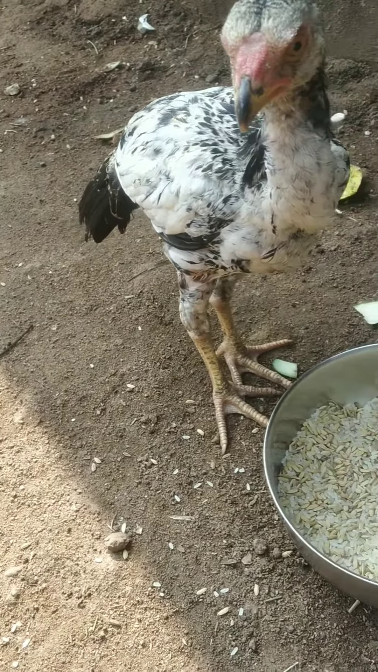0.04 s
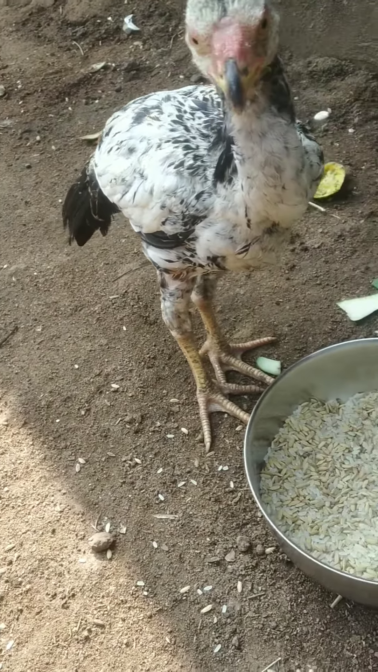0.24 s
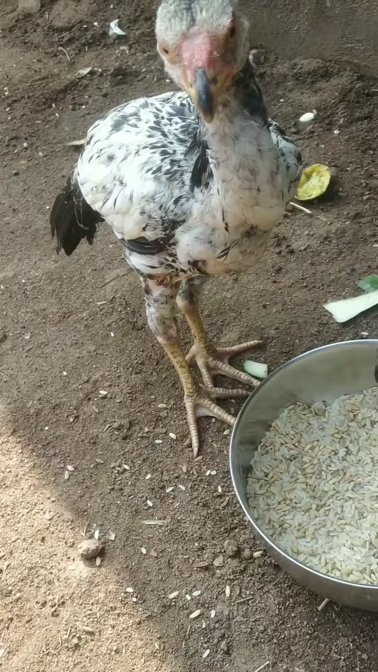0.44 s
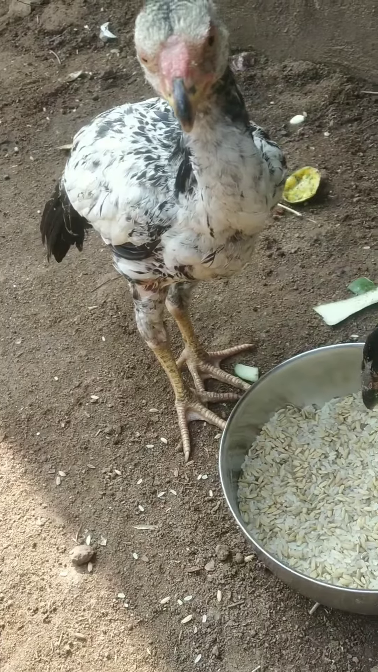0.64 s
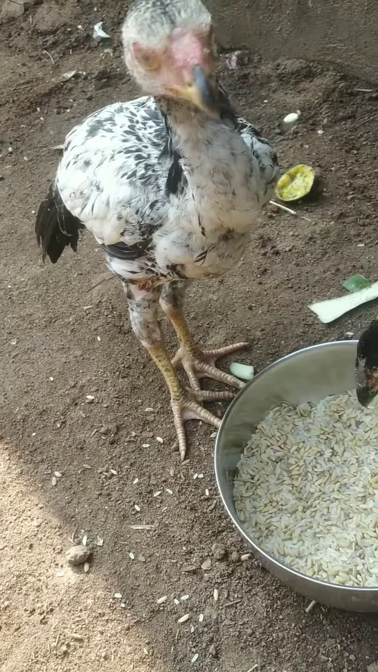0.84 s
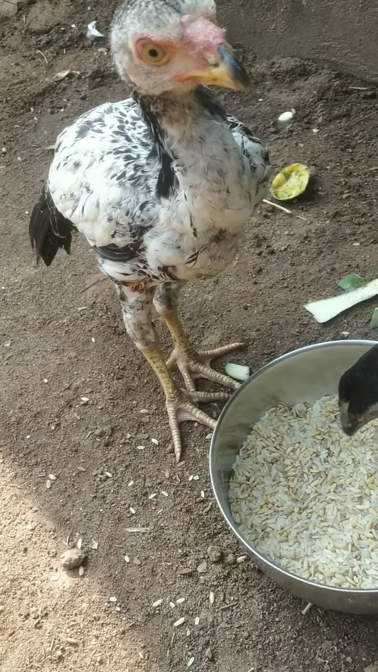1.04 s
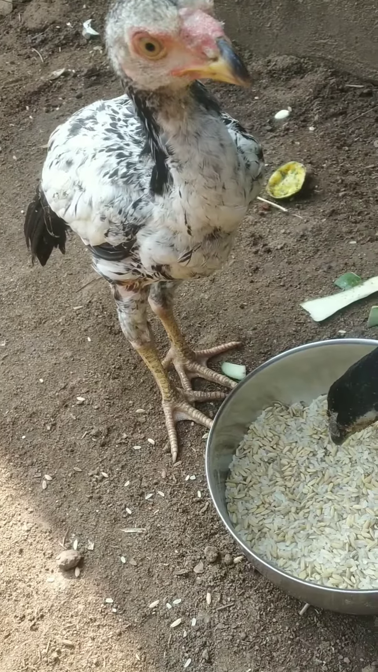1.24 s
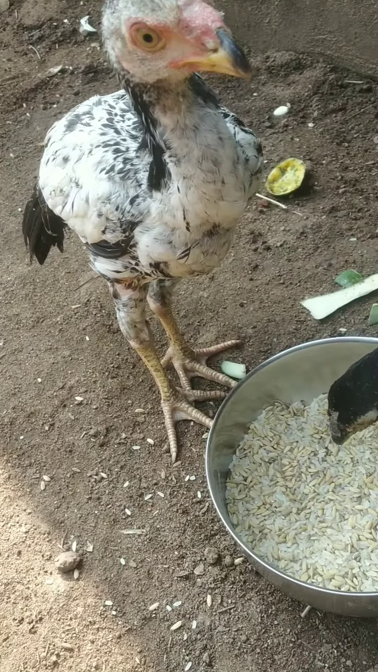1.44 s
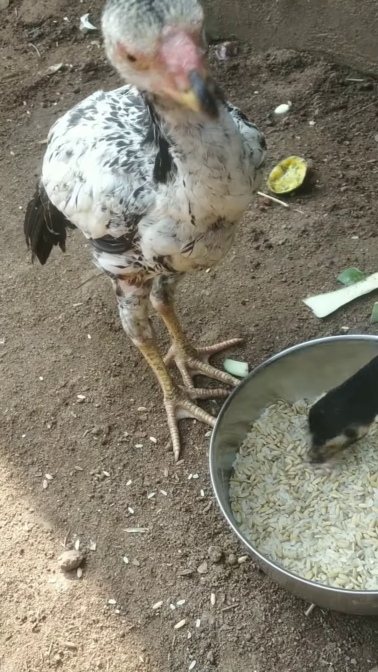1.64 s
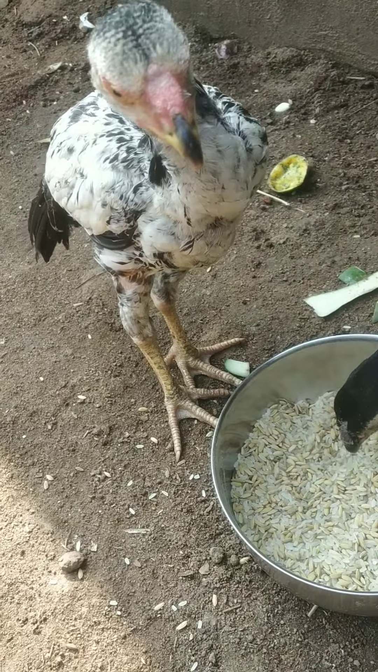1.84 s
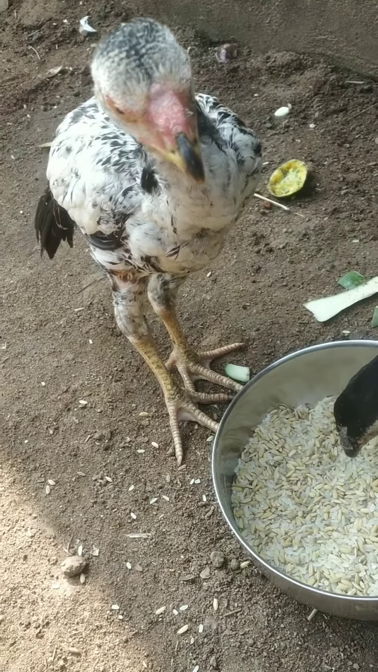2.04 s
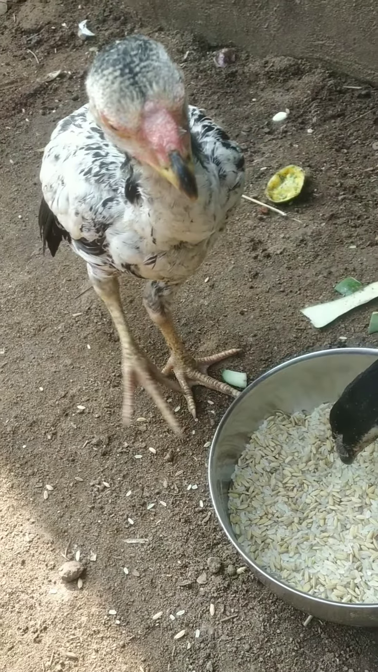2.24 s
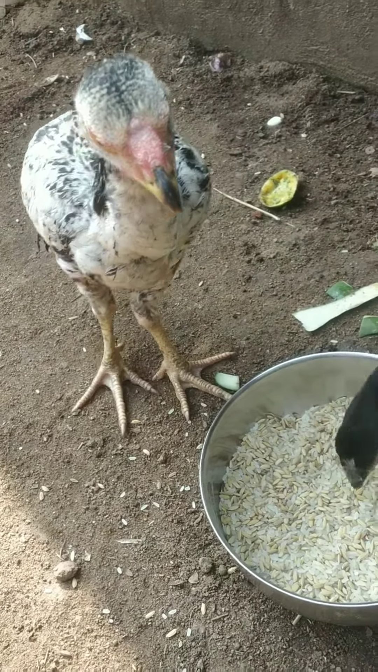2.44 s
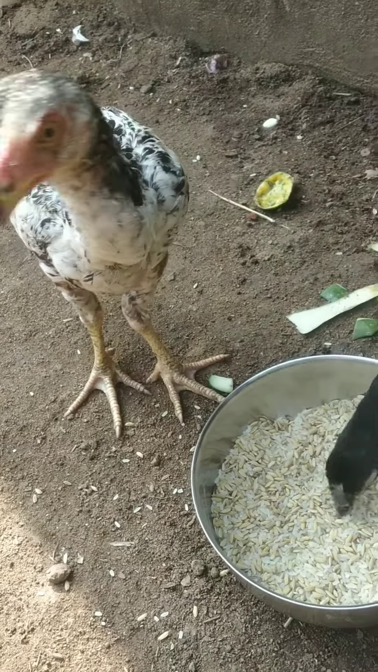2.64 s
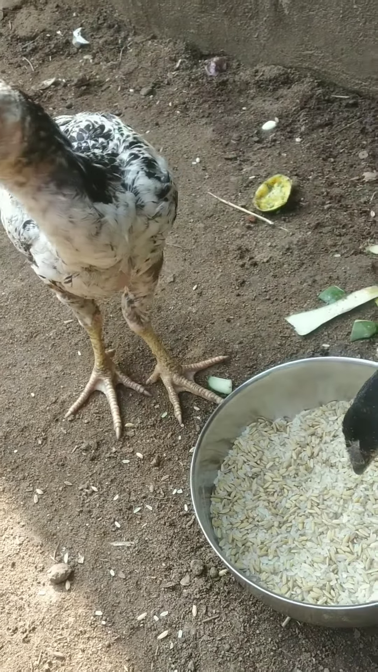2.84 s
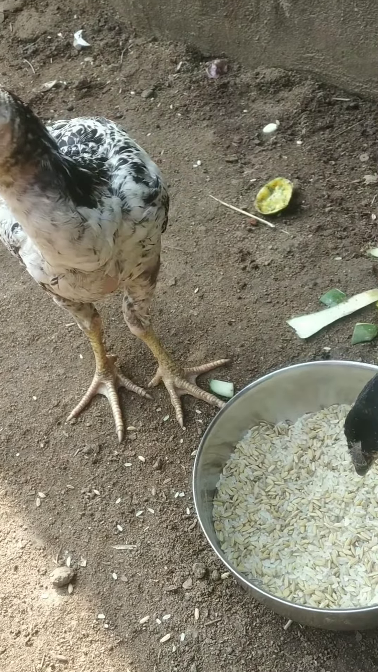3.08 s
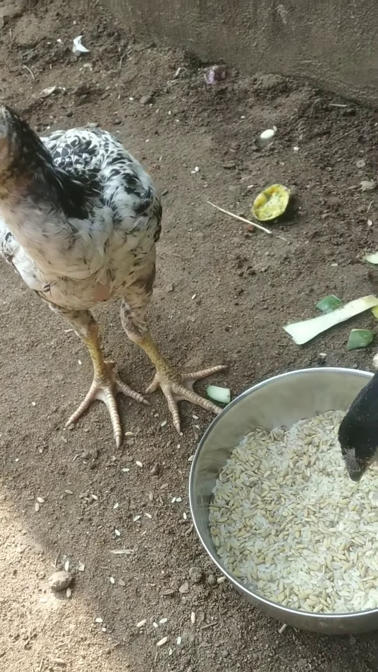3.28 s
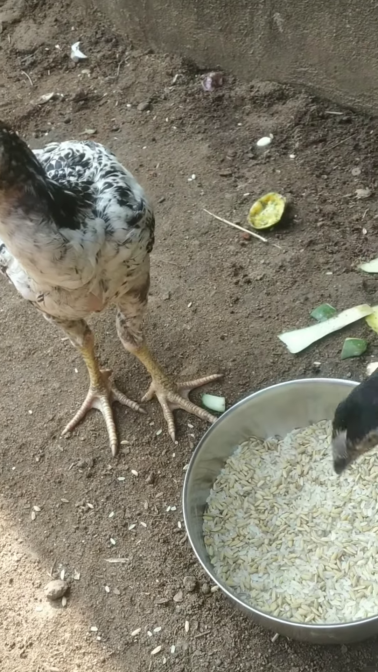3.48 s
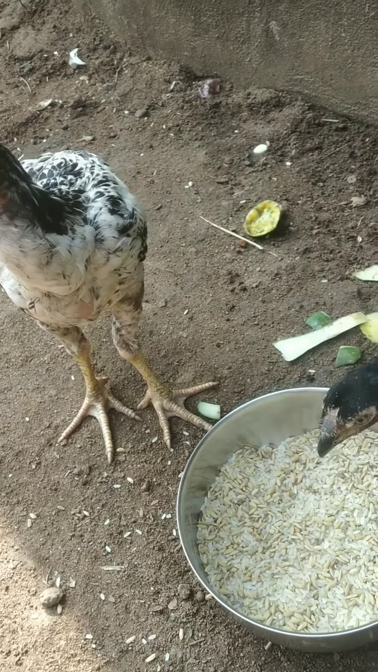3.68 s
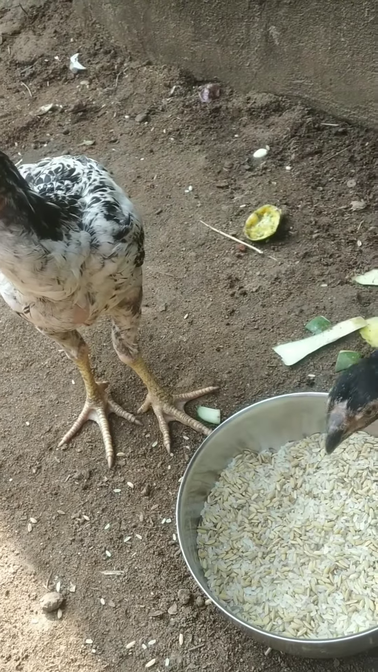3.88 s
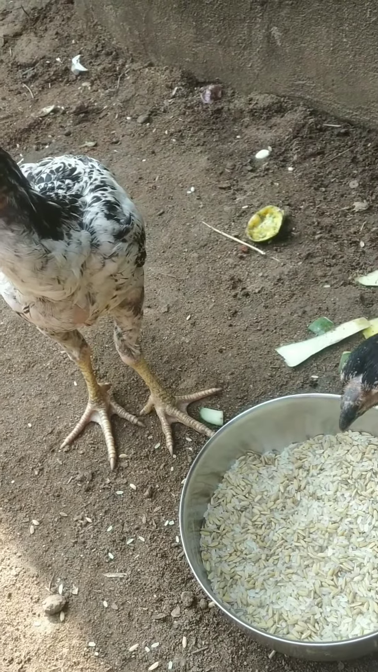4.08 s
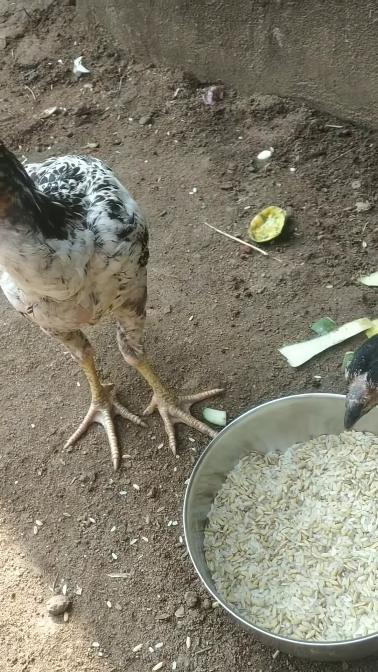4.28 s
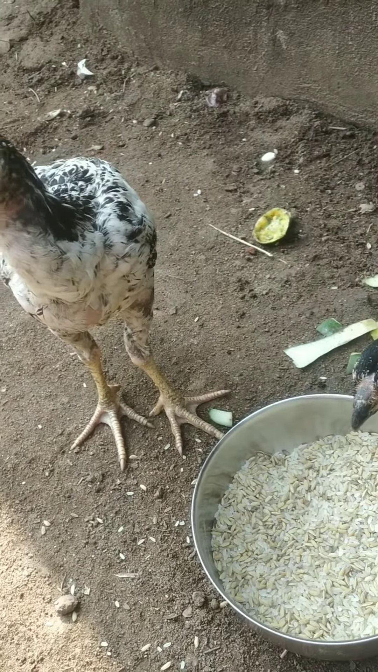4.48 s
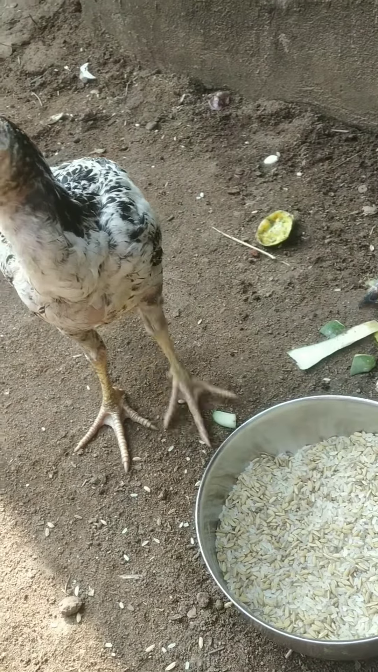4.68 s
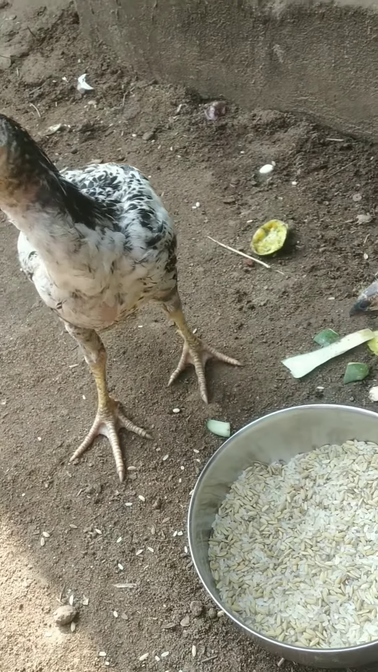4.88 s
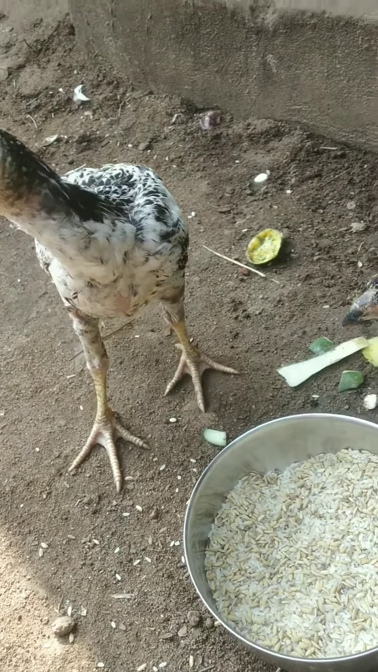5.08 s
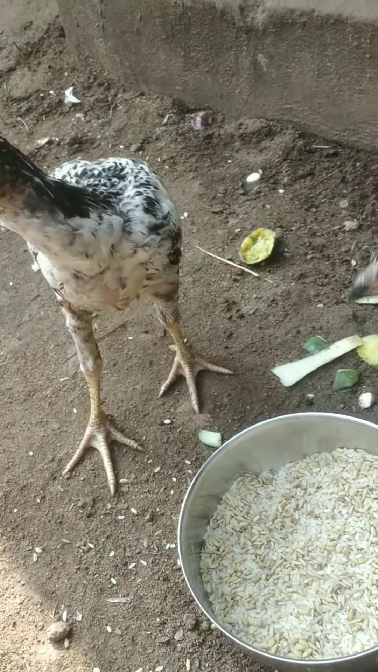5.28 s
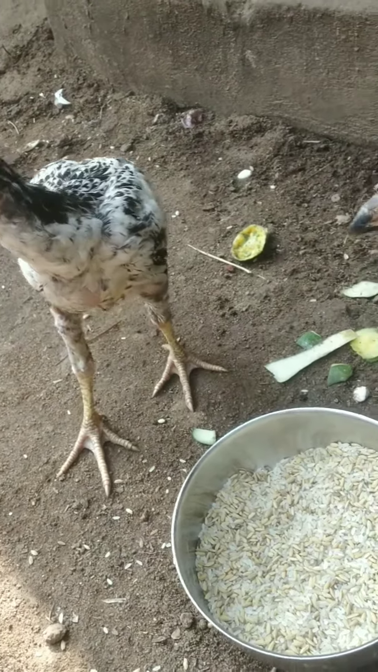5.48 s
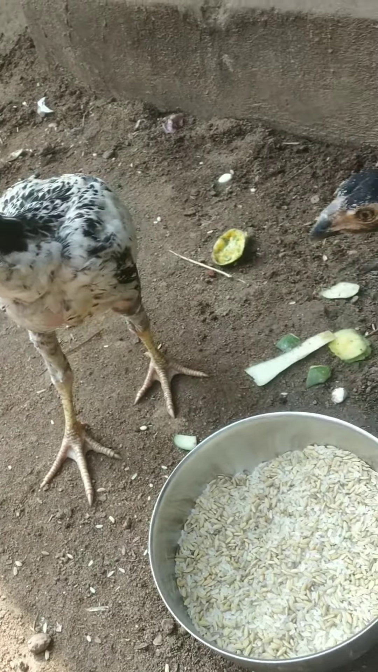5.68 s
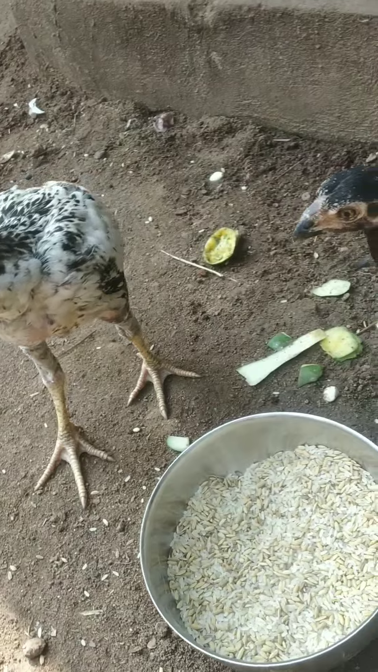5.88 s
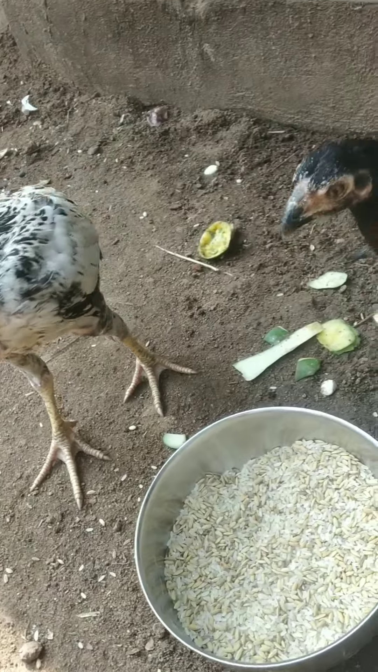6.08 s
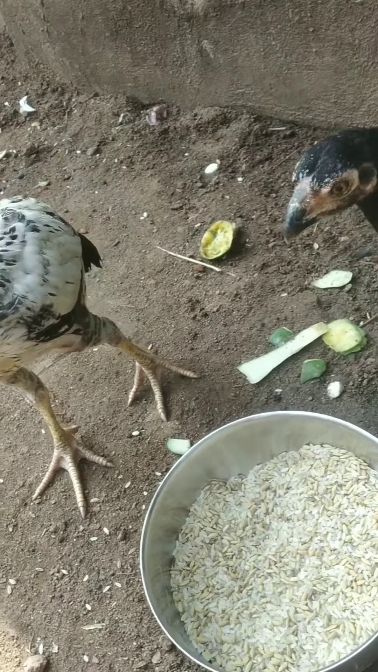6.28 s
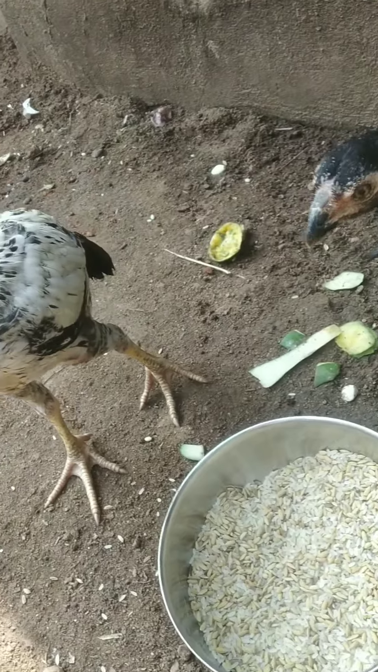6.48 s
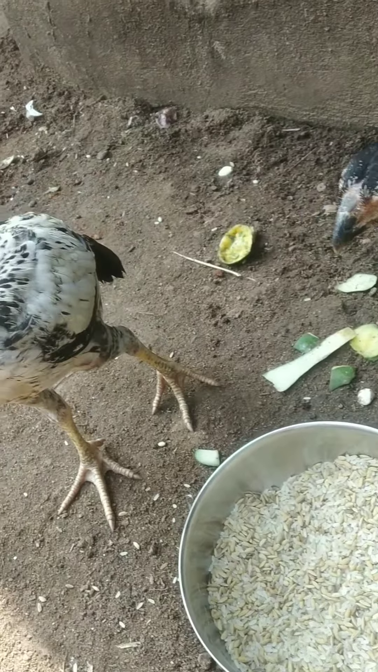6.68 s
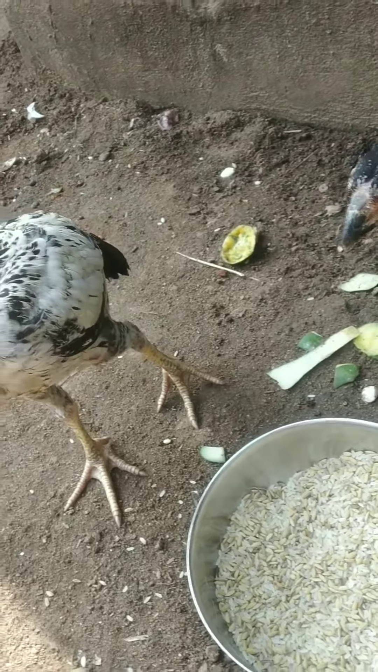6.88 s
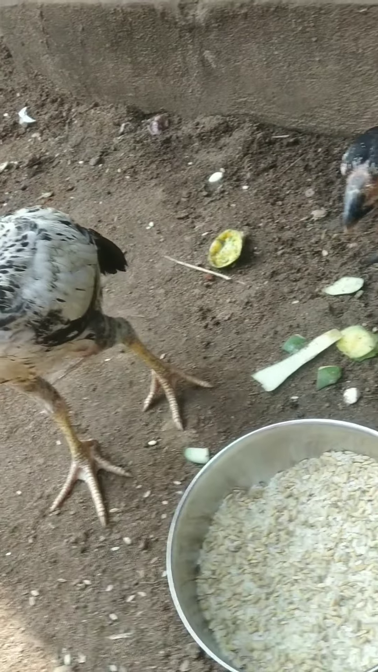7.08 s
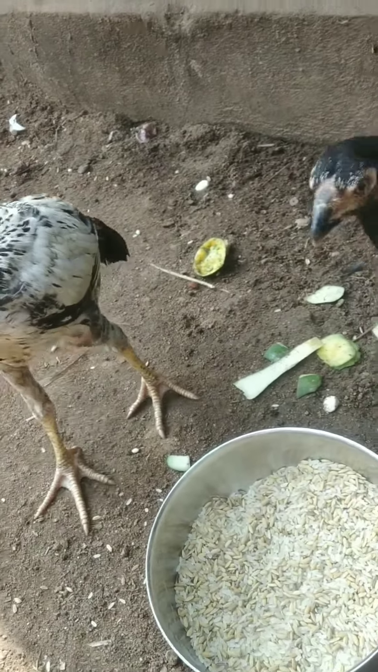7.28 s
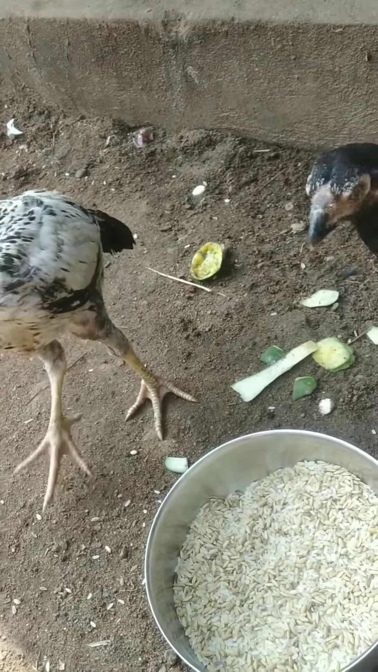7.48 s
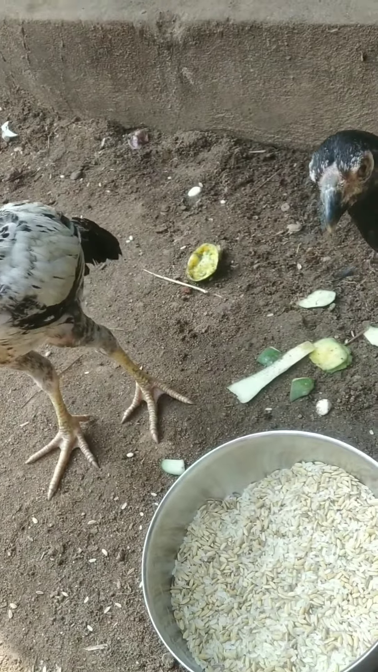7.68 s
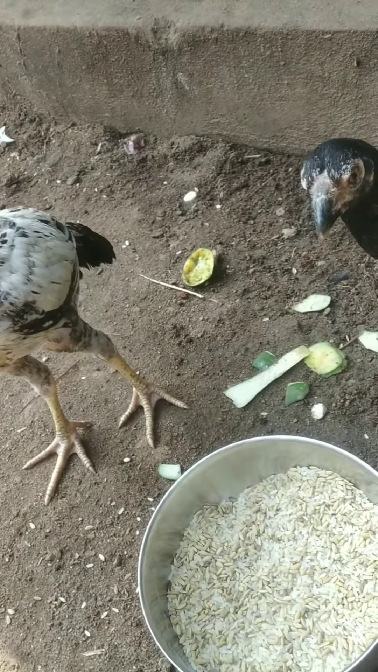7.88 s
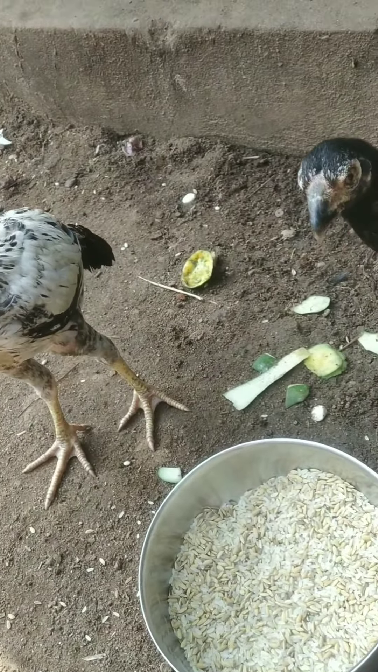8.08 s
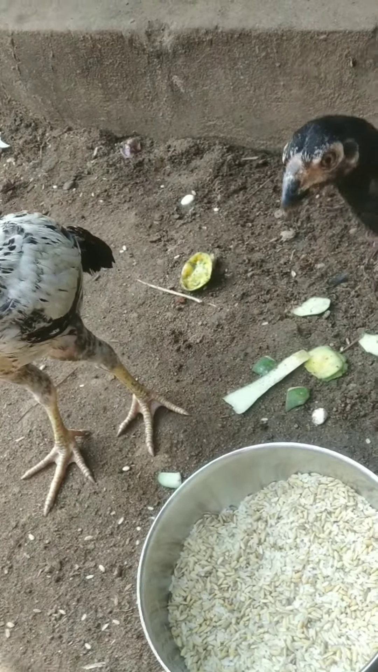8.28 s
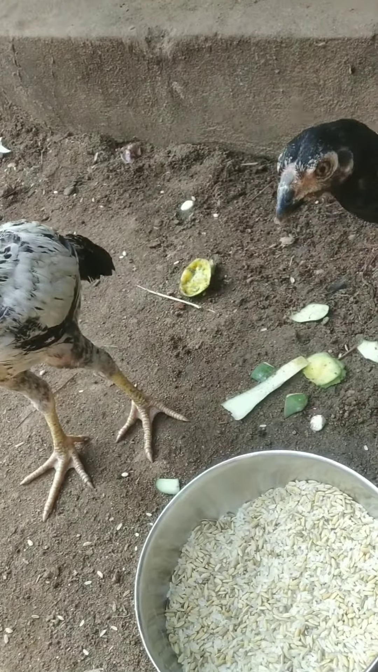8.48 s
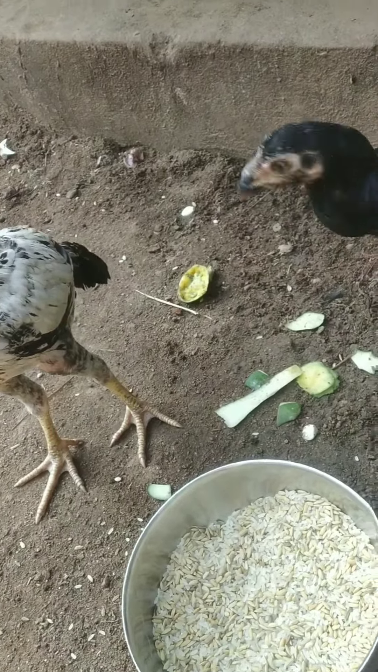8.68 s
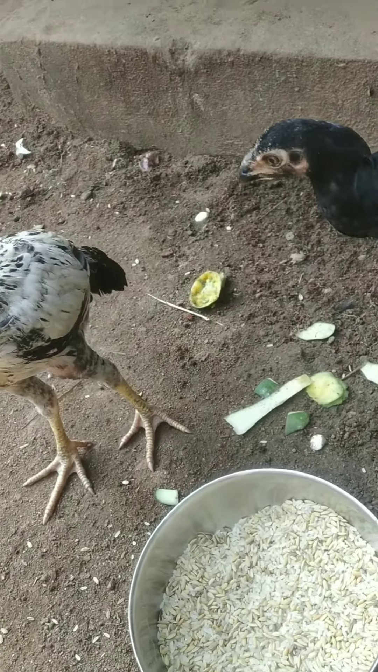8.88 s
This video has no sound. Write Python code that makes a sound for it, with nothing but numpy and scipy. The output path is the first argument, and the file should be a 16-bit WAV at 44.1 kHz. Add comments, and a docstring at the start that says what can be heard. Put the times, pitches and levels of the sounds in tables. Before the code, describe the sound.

Young hens squeak close by in hoarse, trilling calls, with a few low clucks, beak taps and feet scraping grit outdoors.

```python
"""Young hens in a yard

Young hens call close by in hoarse, trilling squeaks: a whistle that rasps where the membranes flap
unevenly. The nearest is on the left, and its loudest squeaks overload the recorder. An older hen
clucks low, feet scrape the grit and beaks tap. Small birds chirp far off, the ground and a low wall
throw short echoes, and traffic hums under a hiss of leaves."""
import sys
import numpy as np
from scipy import signal
from scipy.fft import rfft, irfft
from scipy.io import wavfile
from scipy.ndimage import uniform_filter1d

SR = 44100
rng = np.random.default_rng(int(sys.argv[2]) if len(sys.argv) > 2 else 0)


def file_out(sig):
    """Save sig as 16-bit WAV at sys.argv[1]."""
    # one column per channel
    cols = np.atleast_2d(sig).T
    # limit, then scale
    lim = np.clip(cols, -1, 1)
    pcm = np.round(lim * 32767).astype(np.int16)
    wavfile.write(sys.argv[1], SR, pcm)


N = 393813


def squeak(t, pitch, whistle_db, rasp_db, trill, half, treble_db, trill_hz=50.33, split_hz=4350):
    """A young hen's trilling whistle; where the membranes flap unevenly it smears and rasps."""
    # Windpipe resonances that the whistle rings as it crosses them. Each row: frequency in Hz, gain in dB.
    resonances = [(700, -12), (1100, 18.5), (1500, 12), (2000, 1), (2250, -1), (2480, 0.5), (2700, -2),
                  (2900, -2.5), (3600, 4.5), (5000, 0)]
    # Windpipe and beak colour of the rasp and treble. Each row: frequency in Hz, gain in dB.
    windpipe = [(250, -11), (700, 8.5), (1050, 8), (1700, 8.5), (3600, 7.5), (4150, 22), (4600, -6),
                (5300, 0), (6000, -8), (6900, -4), (8100, -1), (9300, -5.5), (10200, -5.5), (11700, -17),
                (14500, -10), (16000, -2.5)]
    n = len(t)
    trill, half = np.clip([trill, half], 0, 1)
    rough = np.clip((rasp_db - whistle_db + 13.5) / 12, 0, .9)

    # Each trill note arches in pitch, sweeps steeply where the call glides and dips in level at its ends.
    beat = (np.cumsum(trill_hz * (1 + 0.089 * drift(n, 28.6))) / SR) % 1
    arch = np.sin(np.pi * beat) ** .6
    hz = np.interp(t + 2.166 * trill * (beat - .5) / trill_hz, t, pitch)
    hz = uniform_filter1d(hz * (1 + 0.14 * trill * (arch - .75)), size=40)
    turns = np.cumsum(hz * (1 + 0.012 * drift(n, 810) + 0.0112 * rough * drift(n, 46.7))) / SR
    gliding = np.clip(uniform_filter1d(abs(np.gradient(pitch)) * SR, size=300) / 40000, 0, 1)
    depth = trill + 0.35 * (1 - trill) * gliding  # swoops break into separate notes
    throb = (1 - depth + depth * arch ** (0.62 + 1.12 * gliding)) / (1 - 0.055 * depth)
    smear = rough * noise_band(turns, 160 + 1400 * rough.mean() ** 4)
    whistle = np.sqrt(2 - 2 * rough ** 2) * np.sin(2 * np.pi * turns) + smear

    catch = amp(3.2 * drift(n, 15.6))  # the half-pitch bands catch and let go
    below = half * catch * noise_band(turns / 2, 78.5) + 0.33 * noise_band(.72 * turns, 295)
    below += (0.094 + 0.11 * rough) * noise_band(0.57 * turns, 1340)  # a broad wash under the whistle
    between = sum(noise_band(k * turns / 2, 223) * amp(2.46 * drift(n, 21.3)) * (k * hz < .7 * SR)
                  for k in (5, 7, 9))
    between += 0.86 * catch * noise_band(1.58 * turns, 254)  # a nasal band over the whistle
    # Each overtone comes and goes as the beak moves.
    overtones = sum(rough_tone(k * turns, rough, 620) * (k * hz < .35 * SR) * amp(2.1 * drift(n, 23.0))
                    for k in range(2, 6))
    hiss = rng.standard_normal(n) * amp(2.3 * drift(n, 130))
    rasp = evened(below) + 0.25 * hiss + 0.3 * (1 - gliding) * overtones
    rasp = colour(rasp, windpipe, hi_hz=split_hz) * (1 - 0.33 * gliding)
    treble = overtones + half * between + 0.6 * hiss
    treble = colour(treble, windpipe, lo_hz=split_hz) * (1 - 0.7 * gliding)

    height = hz / hz.max()
    effort = np.hypot(0.65 * amp(whistle_db), amp(rasp_db)) * height ** 1.4  # brightest at the top
    voice = amp(whistle_db + curve(resonances, hz)) * whistle
    voice += amp(rasp_db) * height ** 0.27 * rasp
    voice += amp(treble_db + 5.5) * effort * treble
    attack_s, release_s = 0.019, 0.011
    edges = np.clip(t / attack_s, 0, 1) * np.clip((t[-1] - t) / release_s, 0, 1)
    return voice * throb * np.sin(np.pi / 2 * edges) ** 2


def contour(length, fall, from_hz, first_hz, last_hz, to_hz, first_db, last_db, first_rasp, last_rasp):
    """A squeak's pitch swoops in, holds on a slight arch and slides away; both ends are hoarser."""
    swoop_hz_per_s, arch_per_s = 50000, .25
    t = np.arange(0, length, 1 / SR)
    rise = np.clip(abs(first_hz - from_hz) / swoop_hz_per_s, .002, 0.69 * length)
    fall = np.clip(fall, .002, 0.53 * length)
    knees, hold = [0, rise, length - fall, length], length - rise - fall
    bulge = 1 + arch_per_s * hold * np.sin(np.pi * np.clip((t - rise) / hold, 0, 1))
    pitch = np.interp(t, knees, [from_hz, first_hz, last_hz, to_hz]) * bulge
    whistle_db = np.interp(t, knees, [first_db + 2.5, first_db, last_db, last_db])
    whistle_db -= 9.5 * np.clip(1 - (length - t) / fall, 0, 1) ** 2
    hoarse_db = np.interp(t, knees, [first_rasp + 6, first_rasp, last_rasp, last_rasp + 4.5])
    return t, pitch, whistle_db, whistle_db + hoarse_db


def cluck(length, hz, end_hz, db, rough):
    """The older hen: a low stack of overtones, blurred by uneven pulses and shaped by the throat."""
    # Throat colour. Each row: frequency in Hz, gain in dB.
    throat = [(200, -5.5), (400, -6), (720, 14), (1050, 2), (1500, -8), (3000, -14.5)]
    glide = np.linspace(hz, end_hz, round(length * SR))
    turns = np.cumsum(glide * (1 + 0.0885 * rough * drift(len(glide), 79))) / SR
    stack = sum(rough_tone(k * turns, rough, 197) for k in range(1, 9))
    return amp(db) * colour(stack, throat) * signal.windows.tukey(len(glide), .5)


def scrape(length, top_s, grit_db, thud_db):
    """Grains of grit crunch under a claw while the foot thuds on the earth."""
    # Colours of bright grit and dull earth. Each row: frequency in Hz, gain in dB.
    crunch = [(290, -33), (500, 1.5), (3670, 8.5), (4360, 3), (7020, 9), (15800, 8)]
    earth = [(90, -69), (200, -2.5), (450, -10.5), (900, -16.0), (2000, -28.0)]
    t = np.arange(0, length, 1 / SR)
    stroke = amp(np.interp(t, [0, top_s, length], [-4.5, 0, -6.5]))
    grains = rng.standard_normal((2, len(t))) * amp(1.17 * drift(len(t), 730) + 2.6 * drift(len(t), 48))
    grains[1] = .5 * np.roll(grains[0], 21) + 0.35 * grains[1]  # later and softer on the right
    grit = colour(grains, crunch) * amp([[4], [-2]]) * amp(grit_db)
    thud = colour(rng.standard_normal(len(t)) * amp(3.7 * drift(len(t), 26.4)), earth) * amp(thud_db)
    return (grit + thud) * stroke * signal.windows.tukey(len(t), .45)


def tap(db, knock_db):
    """A beak or a kicked stone strikes: a short crack of grit and a dull knock."""
    t = np.arange(1800) / SR
    tick = rng.standard_normal(len(t)) * amp(-60 * t / 0.033) * 0.3
    knock = amp(knock_db) * np.sin(2 * np.pi * rng.uniform(250, 540) * t) * amp(-60 * t / 0.013)
    return amp(db) * (tick + knock) * np.minimum(t / 0.0015, 1)


def chirp(length, hz, end_hz, db):
    """A small bird's falling whistle, blurred by distance and scattered echoes."""
    glide = np.linspace(hz, end_hz, round(length * SR))
    tone = noise_band(np.cumsum(glide) / SR, 310) * signal.windows.tukey(len(glide), .5)
    echoes = rng.standard_normal(3500) * amp(-60 * np.arange(3500) / SR / 0.21)
    return amp(db) * evened(signal.fftconvolve(tone, echoes))


def walls(x, t60=0.11):
    """Scattered echoes from the ground and the low wall."""
    t = np.arange(8000) / SR
    echoes = rng.choice([-1., 1.], (2, len(t))) * (rng.random((2, len(t))) < .05)
    echoes *= amp(-60 * t / t60) * (t > .002)
    return signal.fftconvolve(x.mean(0)[None], echoes / np.linalg.norm(echoes[0]), axes=1)[:, :N]


def yard():
    """Low hum of far traffic under a hiss of leaves, in drifting patches."""
    # Colour of the bed. Each row: frequency in Hz, gain in dB.
    tone = [(24, -36), (60, -20), (125, -11.5), (208, 4), (311, -4), (1200, -9), (1500, -11.5), (1660, -5),
            (1850, -12), (4190, -8.5), (6240, -16.5), (8220, -13), (11700, -16.5), (15800, -12.5)]
    # Its stereo image. Each row: frequency in Hz, left-right correlation.
    image = [(60, 0.81), (240, 0.96), (950, 0.098), (3770, -0.19), (15000, 0.095)]
    # Its slow swell. Each row: time in seconds, level in dB.
    swell = [(0, -42), (1.5, -37), (3.3, -38), (4.2, -35), (5.8, -40.5), (7.2, -36), (8.2, -37),
             (8.93, -37.5)]
    frames, hz = N // 256 + 5, np.fft.rfftfreq(1024, 1 / SR)
    a, b, c, d, patches = rng.standard_normal((frames, 513, 5)).T
    patches = evened(uniform_filter1d(uniform_filter1d(patches, 10, 0), 10, 1))
    left, apart = a + 1j * b, c + 1j * d
    alike = curve(image, hz)[:, None]
    spectra = np.array([left, alike * left + np.sqrt(1 - alike ** 2) * apart])
    flicker_db = 4.93 * patches * np.clip(hz / 1500, .4, 1)[:, None]  # the hum is steadier than the hiss
    spectra *= amp(curve(tone, hz)[:, None] + flicker_db)
    spectra[1] *= amp(-3.5 * np.clip(hz / 10000, 0, 1))[:, None]  # duller on the right
    bed = evened(signal.istft(spectra, nperseg=1024, noverlap=768)[1][:, :N])
    return amp(np.interp(np.arange(N) / SR, *np.transpose(swell))) * bed


def amp(db):
    """Gain of a level in dB."""
    return 10 ** (np.asarray(db) / 20)


def evened(x):
    """Scales to rms 1."""
    return x / np.sqrt(np.mean(x ** 2) + 1e-20)


def curve(points, hz):
    """Reads a table along a log-frequency axis."""
    f, value = np.transpose(points)
    return np.interp(np.log(hz + 1), np.log(f + 1), value)


def colour(x, points, lo_hz=0, hi_hz=SR):
    """Equalises x and keeps it to a band, at rms 1."""
    hz = np.fft.rfftfreq(x.shape[-1], 1 / SR)
    return evened(irfft(rfft(x) * amp(curve(points, hz)) * (hz >= lo_hz) * (hz < hi_hz), x.shape[-1]))


def drift(length, hz):
    """Random wander of rms 1 up to about hz."""
    return evened(signal.lfilter(*signal.butter(4, hz, fs=SR), rng.standard_normal(length + 2000))[2000:])


def noise_band(turns, width_hz):
    """A band of noise that rides on an oscillation."""
    a, b = drift(len(turns), width_hz / 2), drift(len(turns), width_hz / 2)
    return a * np.cos(2 * np.pi * turns) + b * np.sin(2 * np.pi * turns)


def rough_tone(turns, rough, width_hz):
    """A pure partial that blends into a noise band as rough goes from 0 to 1."""
    return (1 - rough) * np.cos(2 * np.pi * turns) + rough * noise_band(turns, width_hz)


def place(mix, start, sound, lag_ms, left_db, shade=0.68):
    """Pans a sound by time and level, duller on the right; a negative lag puts the left first."""
    left = sound * amp(left_db / 2)
    right = signal.lfilter([1 - shade], [1, -shade], sound) * amp(-left_db / 2)
    for channel, late_ms, part in ((0, 0.005, left), (1, -lag_ms, right)):
        slot = mix[channel, round((start + late_ms / 1000) * SR):][:len(part)]
        slot += part[:len(slot)]


def scene():
    """Hens, beaks, feet and far birds, with their echoes, over the bed of the yard."""
    # Squeaks and voice breaks. Each row: start, length and closing slide in seconds; pitch in Hz at the
    # onset, start of hold, end of hold and finish; whistle drive in dB at the start and end of the hold;
    # rasp over that drive in dB at both; left lag in ms; trill depth and half-pitch bands from 0 to 1;
    # treble trim in dB.
    squeaks = [ (0.098, 0.071, 0.044, 1713, 2270, 2400, 940, -8.5, -12.5, -4, -8, -0.35, 0.62, 0.18, -11.5),
               (0.588, 0.13, 0.089, 2730, 2880, 3120, 1650, -28.5, -24, -26, -30, -.8, 0.63, 0.45, -5.5),
               (0.873, 0.066, 0.0067, 2240, 2540, 3480, 4500, -22, -19.5, -21, -27, -0.38, 0.5, 0.8, -2),
               (0.912, 0.22, 0.055, 2930, 3860, 3450, 1500, -27.5, -18, -10, -5, -0.44, 0.62, 0.1, -0.5),
               (1.276, 0.14, 0.0068, 1594, 3000, 2970, 2100, -19.5, -21, 0.5, 2, -0.4, 0.53, 0.3, -4),
               (1.383, 0.15, 0.03, 3225, 3150, 3090, 1600, -10.5, -10, -5, -6, -0.47, 0.5, 0.39, -2.5),
               (1.643, 0.16, 0.036, 1510, 3730, 3100, 1800, -11, -10.5, -9.5, -2, -0.47, 0.62, 0.55, -3),
               (1.961, 0.14, 0.044, 2066, 3270, 3170, 1870, -10.5, -6, -15.5, -20, -0.43, 0.72, .28, -7),
               (2.307, 0.19, 0.024, 2074, 2750, 2720, 2420, -5, -3, -15.5, -10, -0.24, 0.61, 0.19, -18),
               (2.569, 0.026, 0.0043, 1195, 2700, 2760, 2100, -11.5, -9, -12, -16, -0.61, 0.18, 0, 1),
               (2.589, 0.022, 0.005, 1250, 2300, 3000, 1700, -10.5, -1, -13, -12, -0.41, 0.12, 0, 6),
               (2.6, 0.1, 0.035, 3140, 3710, 3180, 2230, -10.5, -5.5, -9, -20, -0.41, 0.72, 0.26, -8.5),
               (2.923, 0.11, 0.0049, 1807, 2930, 3020, 4100, -5, -1, -13.5, -14, -.27, 0.29, 0.37, -13),
               (3.024, 0.07, 0.017, 3280, 3260, 3600, 3500, -16, -17.5, -2, 1, -0.31, 0.5, 0.23, -6.5),
               (3.069, 0.1, 0.025, 2930, 2360, 3360, 1090, -4.5, -10, -21, -5.5, -0.19, 0.58, 0.47, -5.5),
               (3.397, 0.11, 0.021, 2074, 2980, 3090, 2570, -5, -6, -14, -8.5, -0.25, 0.48, 0.24, -14.5),
               (3.641, 0.097, 0.021, 2600, 2050, 3120, 2550, -36.5, -26.5, -29, -33, 0.01, 1, .01, -33),
               (3.972, 0.11, 0.0043, 2750, 3270, 3420, 4800, -13.5, -11.5, -12.5, -11, -0.46, 0.21, 0.15, -7),
               (4.062, 0.079, 0.0091, 3560, 3840, 4180, 4950, -13.5, -12.5, -7, -3.5, -.48, 0.3, 0.01, -0.5),
               (4.122, 0.1, 0.019, 4440, 4700, 4700, 3500, -10.5, -17, -3.5, -3, -0.41, 0.66, 0.12, -7),
               (4.208, .082, 0.019, 3970, 3600, 3640, 1400, -10, -23.5, -14.5, 0.5, -0.38, 0.5, 0.19, -5),
               (4.51, 0.084, 0.008, 1890, 3210, 3350, 2100, -7.5, -4.5, -7, -34, -0.4, 0.03, 0.13, -12.5),
               (4.582, .16, 0.072, 3373, 3800, 3950, 910, -8, -7.5, -18.5, -10, -0.37, 0.43, 0.25, -7.5),
               (5.293, 0.041, 0.021, 3040, 2860, 2630, 2410, -1, -18, -3, -28, -0.39, 0.1, 0.9, -13.5),
               (5.596, 0.059, 0.0093, 2540, 2500, 2830, 3300, -36, -23.5, -18, -26, .15, 0.6, 0.3, -16),
               (5.825, 0.06, 0.026, 2500, 2300, 2500, 2000, -50, -44, -10, -8, 0.11, 0.4, 0.4, -28),
               (6.055, 0.079, 0.026, 2440, 2500, 2130, 1720, -27.5, -19.5, -36, -24, -0.37, 0.4, 0.6, -20),
               (6.347, 0.13, 0.0193, 2416, 2950, 3000, 2900, -11.5, -16, -6, -2.5, -.34, 0.27, 0.66, -9.5),
               (6.39, 0.17, 0.033, 2280, 2040, 1850, 1700, -5, -12.5, -13.5, -8.5, -0.32, 0.84, 0.12, -15),
               (6.476, 0.2, 0.022, 2334, 2990, 2240, 1750, -9.5, -17, 1, 2, -0.32, 0.58, 0.56, -13.5),
               (6.781, 0.12, 0.043, 2283, 2600, 2360, 1560, -7, -13, -5.5, -1, -0.37, 0.57, 0.46, -10.5),
               (6.994, 0.12, 0.034, 3276, 3260, 3280, 900, -14.5, -12.5, -10.5, -5, -0.36, 0.83, 0.27, -0.5),
               (7.24, 0.058, 0.0055, 1827, 2060, 2420, 3750, -1.5, -7.5, -28, -8.5, -.2, .42, 0.6, -18.5),
               (7.283, 0.08, 0.021, 2716, 2530, 2880, 1220, -6.5, -12, -10, -9, -0.27, 1, 0.54, -13),
               (7.494, 0.15, 0.053, 2980, 3760, 3180, 1520, -23, -13, -5, -7, -0.34, 0.59, 0.2, -2.5),
               (7.718, 0.052, 0.01, 1387, 2300, 2120, 4000, -17.5, -23, -4.5, -8.5, -0.31, 0.53, 0.3, -2),
               (7.749, 0.06, 0.04, 2565, 3600, 3600, 1300, -16, -25.5, -9, 2, -0.39, 0.5, 0.1, 0),
               (8.102, 0.18, 0.05, 2570, 3500, 3300, 2500, -19, -9, -12, -22, -0.32, 0.51, 0.21, -17),
               (8.793, 0.1, 0.015, 2840, 2880, 2780, 2160, -13.5, -11.5, -21, -18, -0.21, 0.33, 0, -26), ]
    # Low clucks. Each row: start and length in seconds, first and last pitch in Hz, level in dB,
    # roughness from 0 to 1.
    clucks = [(0.814, 0.14, 428, 413, -41, 0.2), (0.93, 0.13, 245.8, 257.7, -24, 0.42),
              (3.388, 0.11, 388.6, 359, -19, 0.84), (4.502, 0.069, 1060, 1005, -17, 0.16),
              (6.483, 0.13, 356, 341, -19.5, 0.3), (6.723, 0.091, 368, 375.4, -19.5, 0.27),
              (6.804, 0.055, 344, 300, -23.5, 0.52), (7.627, 0.041, 1020, 1008, -16.5, 0.14),
              (8.813, 0.13, 323.5, 421, -18.5, 0.58)]
    # Far birds. Each row: start and length in seconds, first and last pitch in Hz, level in dB.
    chirps = [(.22, 0.14, 5820, 5700, -46), (0.341, 0.091, 5490, 3670, -36.5),
              (0.222, 0.073, 4270, 3480, -39.5), (4.802, 0.1, 5410, 3610, -36.5),
              (5.621, 0.16, 5250, 3900, -37), (5.85, 0.17, 6060, 4300, -51), (6.1, 0.14, 6010, 3440, -38.5),
              (8.462, 0.06, 4630, 3500, -45.5), (8.6, 0.084, 4810, 3780, -39.5)]
    # Beak taps and kicked stones. Each row: start in seconds, gain in dB, knock trim in dB.
    taps = [(2.269, -15, -41), (3.925, -34, -19), (3.9447, -24, -5), (4.1966, 2, -3.5), (4.3879, 5, -5),
            (5.04, -5, -9), (5.0615, -18.5, 7), (5.1015, 4, -15), (5.1246, 4.5, -13), (5.598, -14, -12),
            (6.973, -18.5, -2), (6.991, -10.5, -9), (7.421, -11, -5), (7.5057, -3, -3.5), (7.898, -15.5, 2)]
    # Feet on grit, and at 0.923 s a dull thud under the older hen's cluck. Each row: start, length and time to
    # the peak in seconds, grit and thud gains in dB.
    scrapes = [(0.923, 0.2, 0.057, -50, -32), (2.725, 0.082, 0.054, -27.5, -35),
               (3.174, 0.26, 0.21, -30.5, -40.5), (4.333, 0.097, 0.05, -41, -26.5),
               (4.989, 0.37, 0.093, -23.5, -31.5), (7.391, 0.26, 0.18, -32, -26.5)]
    mix = np.zeros((2, N))
    for start, *shape, lag_ms, trill, half, treble_db in squeaks:
        call = squeak(*contour(*shape), trill, half, treble_db)
        place(mix, start, call, lag_ms, left_db=-lag_ms)  # a hen on the left is sooner and louder there
    for start, *row in clucks:
        place(mix, start, cluck(*row), lag_ms=-.1, left_db=0.2)
    for start, *row in chirps:
        place(mix, start, chirp(*row), lag_ms=.1, left_db=-.5)
    for start, *row in taps:
        place(mix, start, tap(*row), lag_ms=-.45, left_db=4)
    for start, *row in scrapes:
        sound = scrape(*row)
        mix[:, round(start * SR):][:, :sound.shape[1]] += sound
    return mix + amp(-5.5) * walls(mix) + yard()


def record(dry):
    """The microphone drops the deep bass, peaks flatten at full scale and the very top is cut."""
    low_cut_hz, high_cut_hz = 100, 15820
    thin = signal.lfilter(*signal.butter(2, low_cut_hz, "high", fs=SR), dry)
    clipped = thin / (1 + thin ** 8) ** (1 / 8)
    lowpass = signal.firwin(767, high_cut_hz, window=("kaiser", 9), fs=SR)
    return signal.oaconvolve(clipped, lowpass[None], "same")


dry = scene()
out = record(dry)
file_out(out)
```